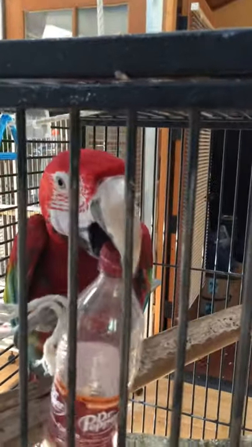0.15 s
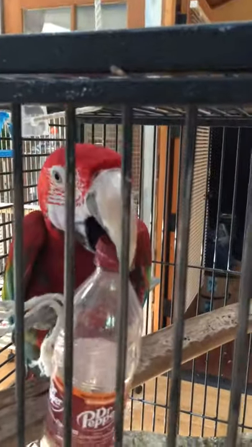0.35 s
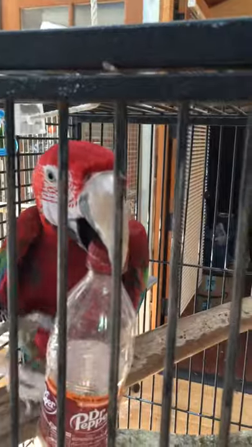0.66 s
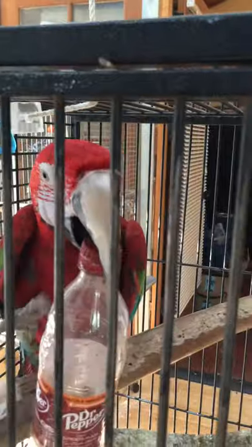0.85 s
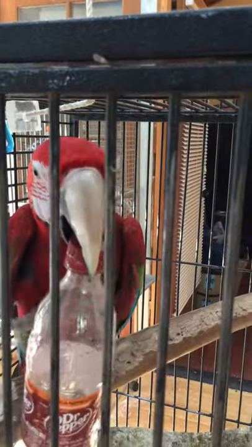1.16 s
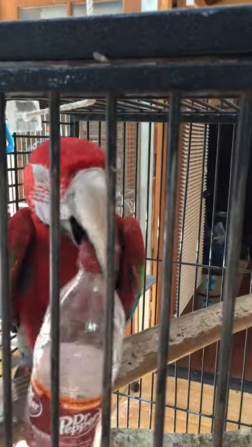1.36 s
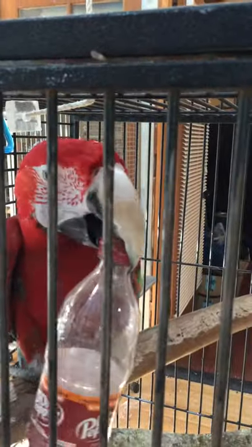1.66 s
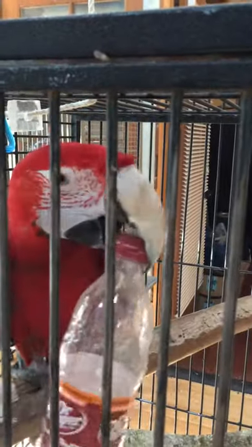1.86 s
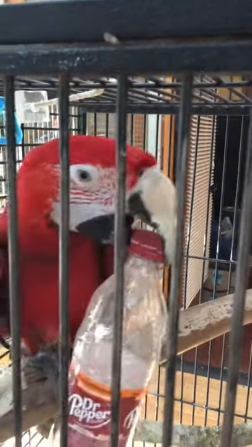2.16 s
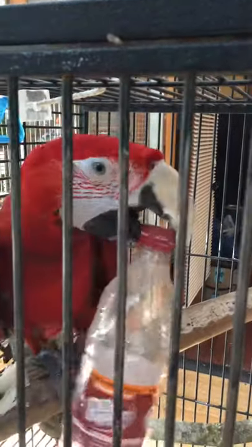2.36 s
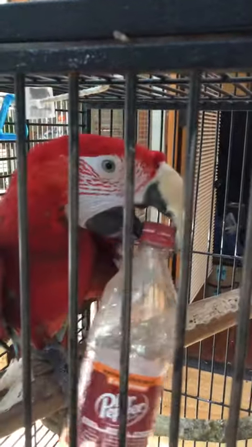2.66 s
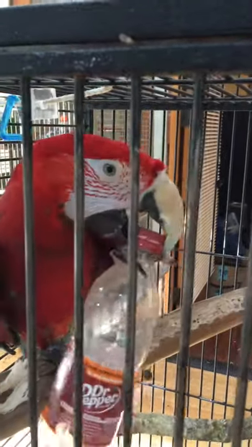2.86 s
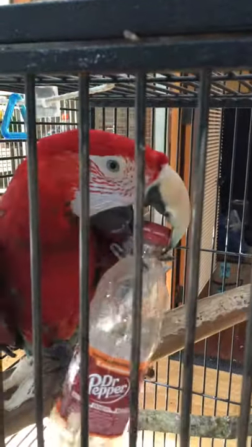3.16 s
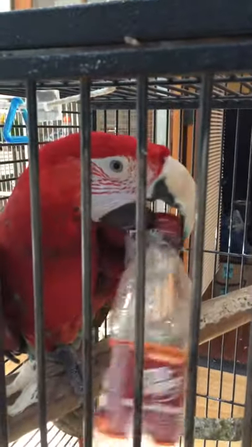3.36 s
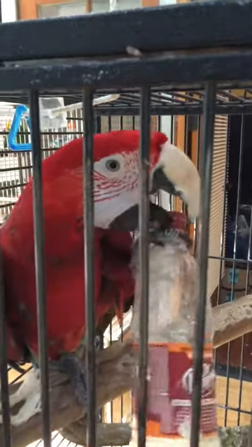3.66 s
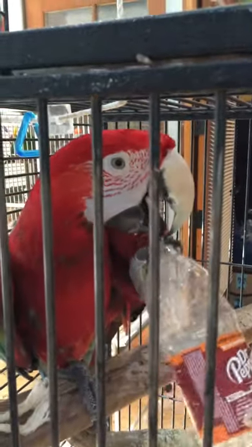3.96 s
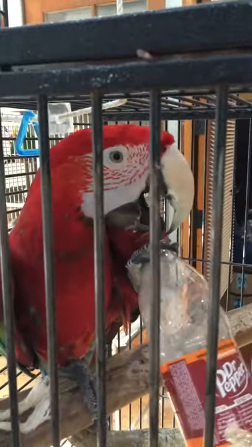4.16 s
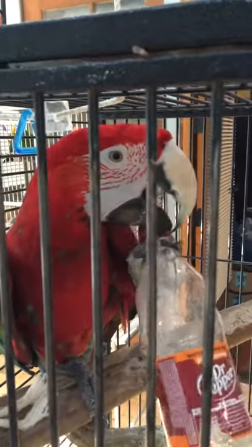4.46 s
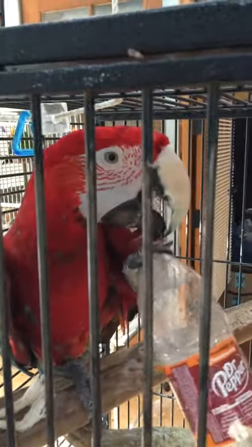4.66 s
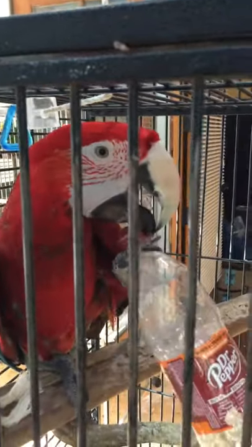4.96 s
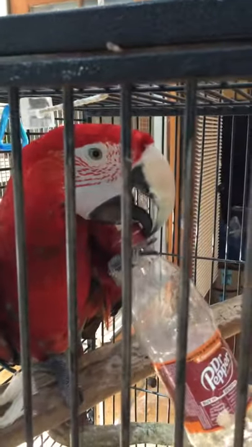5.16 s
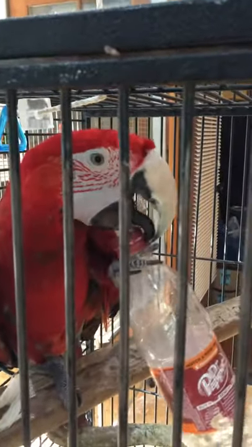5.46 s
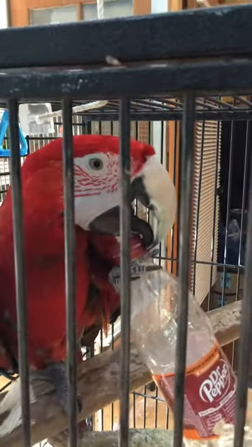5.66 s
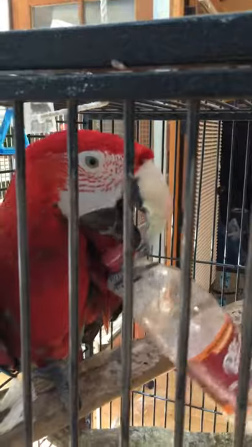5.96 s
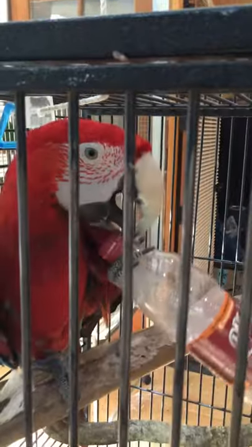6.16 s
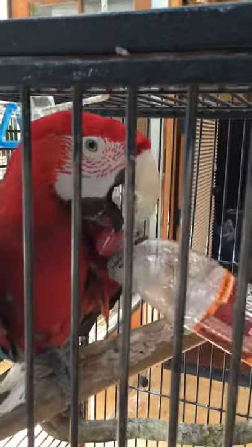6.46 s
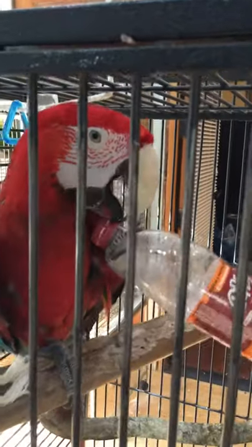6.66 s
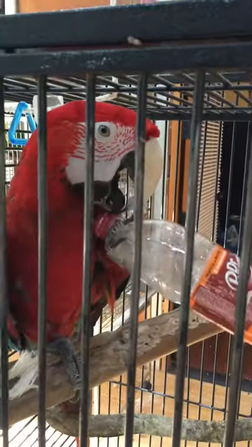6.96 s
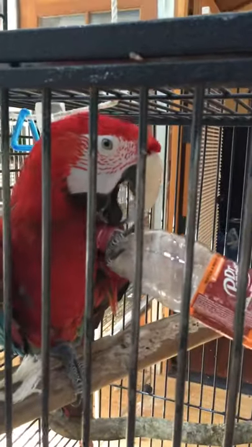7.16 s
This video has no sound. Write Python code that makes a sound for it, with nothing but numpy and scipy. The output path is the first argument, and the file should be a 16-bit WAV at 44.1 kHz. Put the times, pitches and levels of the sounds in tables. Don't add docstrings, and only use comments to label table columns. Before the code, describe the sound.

In a hard-walled bird room, the tail of a croak gives way to four long, rough parrot screams, the second loudest, with a tiny squeal between. After about four seconds it quietens: a beak knocks on a nearby hollow plastic bottle, feathers flutter, cage metal faintly jingles. A short grunt and screech end it. A phone hears the birds some metres off, the bottle close.

```python
import sys
import numpy as np
from scipy import signal
from scipy.fft import rfft, irfft
from scipy.io import wavfile
from scipy.ndimage import uniform_filter1d, minimum_filter1d

SR = 44100
rng = np.random.default_rng(int(sys.argv[2]) if len(sys.argv) > 2 else 0)


def to_wav(s):
    ch = np.atleast_2d(s).T
    pcm = np.round(np.clip(ch, -1, 1) * 32767)
    wavfile.write(sys.argv[1], SR, pcm.astype(np.int16))


def attenuation_scalar(level_db):
    decades = np.asarray(level_db, float) / 20
    return 10 ** decades


N = 322812
LEAD = 10000


def evened(x):
    return x / np.sqrt(np.mean(x ** 2) + 1e-20)


def read(points, hz):
    f, value = np.transpose(points)
    return np.interp(np.log(hz + 1), np.log(f + 1), value)


def coloured(x, points, tilt_db=0):
    hz = np.fft.rfftfreq(len(x), 1 / SR)
    gain_db = read(points, hz) + tilt_db * np.log2(hz / 4000 + 0.00045)
    return evened(irfft(rfft(x) * attenuation_scalar(gain_db), len(x)))


def add(mix, s, sound):
    part = mix[round(s * SR) + LEAD:][:len(sound)]
    part += sound[:len(part)]


def wander(size, smooth_s):
    span = max(int(smooth_s * SR), 1)
    noise = rng.standard_normal(size)
    return evened(uniform_filter1d(uniform_filter1d(noise, span), span))


def resonate(x, hz, width):
    turn = np.exp(2j * np.pi * np.cumsum(hz * np.ones(len(x))) / SR)
    r = np.exp(-np.pi * width / SR)
    return 2 * (turn * signal.lfilter([1 - r], [1, -r], x / turn)).real


def pulses(turns, hz):
    return sum(np.cos(2 * np.pi * k * turns) for k in range(1, int(16000 / hz.max()) + 1))


# (t/s, length/s, effort level/dB, sag/dB per s, rise/s)
SQUAWKS = [
    (.488, .6, -9, -7, .085),
    (1.331, .56, -7, -7.5, 0.12),
    (2.2, 0.59, -10.5, 1.5, 0.12),
    (3.089, .56, -11, 0.5, 0.062),
]
# (lower shut f/Hz, lower open f/Hz, upper shut f/Hz, upper open f/Hz)
THROATS = [(1860, 1990, 2700, 2730), (1920, 2000, 2650, 2740), (1850, 1930, 2590, 2770),
           (1798, 1920, 2560, 2680)]
# (left level/dB, right level/dB, flare t/s after start, flare level/dB)
TONES = [(-17.5, -22, .1, 4), (-17, -20.5, .44, 3), (-19, -21, .43, 9.5), (-21.5, -21.5, 0.096, 4)]
# (left start f/Hz, left end f/Hz, right start f/Hz, right end f/Hz, band jump f/Hz)
SIDES = [(913.6, 892, 1095, 1085, 180), (895.4, 880, 1070, 1080, 140), (894, 840, 1030, 1060, 35),
         (858, 835, 1035, 1060, 83)]
# (f/Hz, level/dB per Hz)
SQUAWK_COLOUR = [(200, -54.5), (400, -41.5), (590, -33.5), (700, -22.5), (880, -13), (1100, -17.5),
                 (1300, -13), (1680, -8.5), (2000, -5), (2800, -5.5), (3100, -7.5), (3700, -7), (6500, -19),
                 (15500, -47)]


def squawk(row, throat, tone, sides):
    s, length, level_db, sag_db, rise = row
    left_tone_db, right_tone_db, flare_s, flare_db = tone
    left_from, left_to, right_from, right_to, jump_hz = sides
    t = np.arange(0, length, 1 / SR)
    size = len(t)

    onset_db = -25.5 * np.maximum(1 - t / rise, 0) ** 2
    release_db = -14 * np.maximum(1 - (length - t) / 0.04, 0)
    effort_db = level_db + sag_db * t + onset_db + release_db
    beak = 1 - (1 - t / length / 0.7) ** 2
    low_hz, high_hz = (shut + (wide - shut) * beak for shut, wide in np.reshape(throat, (2, 2)))
    flare = np.exp(-((t - flare_s) / 0.036) ** 2)
    rough = np.clip(0.66 - 0.18 * flare + 0.08 * wander(size, 0.023), 0, 1)

    left_hz = np.linspace(left_from, left_to, size)
    right_hz = np.linspace(right_from, right_to, size)
    left = np.cumsum(left_hz * (1 + 0.016 * wander(size, 0.004))) / SR
    right = np.cumsum(right_hz * (1 + 0.02997 * wander(size, 0.004))) / SR
    chop = 0.57 + np.cos(2 * np.pi * right) + 0.5 * np.cos(4 * np.pi * right)
    voiced = (1 + pulses(left, left_hz)) * chop
    puffs = 0.24 + np.exp(-(left % 1) / 0.5)
    air = puffs * attenuation_scalar(1.1 * wander(size, 0.0047)) * rng.standard_normal(size)
    drive = coloured((1 - rough) * evened(voiced) + rough * evened(air), SQUAWK_COLOUR)

    holding = np.minimum(np.arange(size)[::-1] / (0.07 * SR), 1)
    low, high = (holding * attenuation_scalar(flare_db * flare + 3.5 * wander(size, 0.013)) for _ in range(2))
    low_jumps, high_jumps = (jump_hz * np.round(0.85 * wander(size, 0.022)) for _ in range(2))
    low_band = 2.35 * low * resonate(drive, low_hz + low_jumps, 60)
    high_band = 2.4 * high * resonate(drive, high_hz + high_jumps, 64)
    drive = drive + low_band + high_band

    left_gain = 1.35 * attenuation_scalar(left_tone_db + 4 * wander(size, 0.018))
    right_gain = 1.56 * attenuation_scalar(right_tone_db + 4 * wander(size, 0.018))
    tones = holding * (left_gain * np.sin(2 * np.pi * left) + right_gain * np.sin(2 * np.pi * right))
    flutter = attenuation_scalar(2.2 * wander(size, 0.005))
    return s, attenuation_scalar(effort_db) * (evened(drive) + tones) * flutter * signal.windows.tukey(size, 0.05)


def columns(rows):
    s, *values = np.transpose(rows)
    t = np.arange(s[0], s[-1], 1 / SR)
    return s[0], [np.interp(t, s, v) for v in values]


# (t/s, effort level/dB, pitch f/Hz)
CROAK = [(-.2, -5, 402), (0, -8.5, 412.1), (.07, -15, 420.7), (.185, -16.5, 430.2), (.205, -25.5, 435)]
SQUEAL = [(1.97, -36, 2030), (2.0, -21.5, 2062), (2.06, -24, 2161), (2.1, -17, 2098), (2.135, -18, 2080),
          (2.15, -12.5, 2028), (2.17, -22.5, 2062), (2.21, -35.5, 2050)]
SCREECH_ONSET = [(6.999, -41, 1435), (7.05, -20.5, 1520), (7.115, -24, 1470)]
SCREECH = [(7.07, -26.5, 1947), (7.115, -13.5, 1967), (7.18, -20, 2040), (7.235, -26, 2091)]
# (f/Hz, level/dB per Hz)
CROAK_COLOUR = [(250, -35.5), (420, -26.5), (840, -7.5), (1270, -5.5), (1700, 2), (2100, -1.5),
                (2450, -2.5), (2800, -4), (3400, -2), (5800, -14.5), (15500, -43.5)]
SQUEAL_COLOUR = [(700, -56.5), (1100, -39), (2050, -9), (3100, -8), (4150, -2), (6200, -8), (8200, -12.5),
                 (10500, -19.5), (15500, -27.5)]
SCREECH_ONSET_COLOUR = [(350, -70), (600, -46), (716, -46), (1360, -15), (2190, -12), (3030, -5), (3610, -14.5),
                        (9760, -31), (15500, -52)]
SCREECH_COLOUR = [(350, -85), (600, -57), (1230, -32), (1990, -6.5), (2750, -13.5), (3820, -1.5),
                  (4810, -13), (5440, -13), (7430, -15.5), (10300, -24), (12500, -32.5), (14300, -32),
                  (15500, -38)]
CROAK_VOICE = (0.55, .25, .3, 0.11, .016, .1)
SQUEAL_VOICE = (.68, -.05, .05, .55, .011, -0.06)
SCREECH_ONSET_VOICE = (.65, 0.6, .45, .22, .035, 0.085)
SCREECH_VOICE = (.57, .63, .5, 0.76, .036, .45)


def call(rows, colour, voice):
    s, (effort_db, hz) = columns(rows)
    size = len(hz)
    rough_from, rough_to, doubling_from, doubling_to, jitter, throb_depth = voice
    rough = np.clip(np.linspace(rough_from, rough_to, size), 0.1, 1)
    doubling = np.clip(np.linspace(doubling_from, doubling_to, size), 0.1, 1)
    turns = np.cumsum(hz * (1 + jitter * wander(size, 0.005))) / SR
    voiced = pulses(turns, hz) * (1 + doubling * np.cos(np.pi * turns))
    air = (0.39 + np.exp(-(turns % 1) / 0.41)) * rng.standard_normal(size)
    drive = coloured((1 - rough) * evened(voiced) + rough * evened(air), colour)
    throb_hz = 93.14 * (1 + 0.15 * wander(size, 0.02))
    throb = 1 + throb_depth * np.cos(2 * np.pi * np.cumsum(throb_hz) / SR)
    flutter = attenuation_scalar(2.06 * wander(size, 0.0045))
    return s, attenuation_scalar(effort_db) * drive * throb * flutter * signal.windows.tukey(size, 0.06)


# (t/s, peak level/dB, ring f/Hz, t60/s)
KNOCKS = [(4.067, -20, 1170, 0.025), (4.085, -33.5, 906, 0.019), (4.169, -40, 1160, 0.033),
          (4.244, -54, 676, 0.023), (4.561, -18.5, 1148, 0.024), (4.828, -48, 1150, 0.033),
          (4.845, -47, 1155, 0.03), (4.896, -50.5, 1160, 0.033), (4.909, -45, 1150, 0.026),
          (4.966, -48, 1130, 0.025), (4.582, -39.5, 927, 0.043), (4.6, -44, 1140, 0.027),
          (5.045, -37, 1160, 0.022), (5.154, -36.5, 1090, 0.02), (5.196, -58, 1100, 0.018),
          (5.885, -43, 641, 0.018), (6.129, -31.5, 1200, 0.018), (6.357, -28, 1020, 0.03),
          (6.798, -53.5, 1180, 0.025), (7.129, -39, 1000, 0.015), (7.203, -45, 910, 0.09),
          (7.288, -49, 900, 0.022)]


def knock(s, peak_db, hz, t60):
    t = np.arange(3000) / SR
    wall = attenuation_scalar(-60 * t / t60) * np.sin(2 * np.pi * hz * t)
    hollow = 0.42 * attenuation_scalar(-60 * t / 0.023) * np.sin(2 * np.pi * 0.6 * hz * t)
    tick = 0.29 * attenuation_scalar(-60 * t / 0.0059) * np.sin(2 * np.pi * 2.1 * hz * t)
    return s, -attenuation_scalar(peak_db) * (wall + hollow + tick) * np.minimum(t / 0.0009, 1)


# (t/s, level/dB, rise/s, hold/s, brightness/dB per octave)
SHAKES = [(1.248, -47.5, 0.016, .05, -1.5), (4.275, -48.5, 0.063, 0.109, -0.5),
          (5.036, -47, 0.0042, .03, 1.5), (5.219, -53, 0.0068, 0.088, -0.5), (5.505, -42, 0.0049, .06, 3.5),
          (6.288, -55, 0.012, 0.03, 1), (6.454, -43, 0.0068, 0.042, 0), (6.764, -58.5, 0.012, 0.049, 2.5)]
# (f/Hz, level/dB per Hz)
SHAKE_COLOUR = [(240, -46.5), (400, -7), (527, -18.5), (784, -1.5), (1000, -10), (1400, -5), (5910, -2.5),
                (11900, -8.5), (15500, -13.5)]


def shake(s, level_db, rise, hold, tilt_db):
    t = np.arange(int((rise + hold + 0.11) * SR)) / SR
    shape = np.minimum(t / rise, 1) * attenuation_scalar(-60 * np.maximum(t - rise - hold, 0) / 0.1)
    flutter = attenuation_scalar(3.8 * wander(len(t), 0.006))
    rustle = coloured(rng.standard_normal(len(t)), SHAKE_COLOUR, tilt_db)
    return s, attenuation_scalar(level_db) * shape * flutter * rustle


# (t/s, level/dB, rattle length/s, which set of modes)
JINGLES = [(4.32, -54, 0.19, 0), (4.72, -58.5, 0.094, 1), (4.961, -73, .05, 2), (5.972, -49, 0.065, 2),
           (2.93, -36, 0.069, 3)]
# (f/Hz, width/Hz, level/dB)
METALS = [
    [(2760, 110, 0), (4200, 170, 0), (5900, 220, -7), (7650, 260, -3), (9850, 220, -9), (12200, 280, -11)],
    [(2830, 90, -4), (5850, 220, 1), (7770, 200, -2), (9940, 130, -10)],
    [(1240, 220, -8), (2240, 200, 0), (2960, 150, -7), (4270, 140, -13), (6150, 120, -20)],
    [(2400, 90, 0), (7200, 200, -14), (12000, 250, -22)],
]


def jingle(s, level_db, length, metal):
    t = np.arange(int(0.6 * SR)) / SR
    taps = rng.standard_normal(len(t)) * (rng.random(len(t)) < 1500 / SR)
    taps = taps + 2.0 * (t == 0)
    ring = np.zeros(len(t))
    for hz, width, db in METALS[round(metal)]:
        mode = evened(resonate(resonate(taps, hz, width), hz, width))
        ring += attenuation_scalar(db) * mode * np.exp(-t / length * (hz / 3000) ** 0.41)
    return s, attenuation_scalar(level_db) * ring


# (f/Hz, t60/s)
ROOM = [(300, 1), (900, 0.62), (1600, 0.69), (3500, 0.64), (9000, 0.45), (15000, 0.35)]


def room(x):
    out = np.zeros(len(x))
    for k in range(3):
        taps = np.zeros(SR)
        at = np.arange(300, SR - 20, 20)
        taps[at + rng.integers(0, 20, len(at))] = rng.choice([-1., 1.], len(at))
        hz, t, z = signal.stft(taps, SR, nperseg=256)
        decay = attenuation_scalar(-60 * t / read(ROOM, hz)[:, None])
        tail = signal.istft(z * decay, SR, nperseg=256)[1]
        share = np.sqrt(2 / 3) * np.cos(2 * np.pi * (0.15 * np.arange(len(x)) / SR + k / 6))
        out += signal.fftconvolve(x * share, tail / np.linalg.norm(tail))[:len(x)]
    return out


def surges(rows, base_db):
    t = np.arange(0, N / SR + 0.01, 0.002)
    power = attenuation_scalar(2 * base_db)
    for s, db, rise, fall in rows:
        swell_db = db - 12.5 * np.maximum(s - t, 0) / rise - fall * np.maximum(t - s, 0)
        power = power + attenuation_scalar(2 * swell_db)
    return np.interp(np.arange(N) / SR, t, np.sqrt(power))


# (peak t/s, level/dB, rise/s, fall/dB per s)
THUDS = [(0.001, -46, .003, 900), (.51, -56, 0.12, 30), (1.45, -63, 0.39, 120), (1.85, -52, 0.068, 100),
         (2.02, -55, 0.048, 16), (3.16, -61.5, 0.1, 20), (3.89, -60.5, .1, 43), (4.2, -54, .08, 7),
         (5.27, -50.5, .04, 30), (5.71, -60, .1, 60), (5.99, -47.5, 0.025, 112), (6.15, -60, 0.054, 18),
         (6.38, -59, .04, 100), (6.5, -57, 0.036, 60), (6.67, -60.5, .08, 14)]
# (peak t/s, level/dB, rise/s, fall/dB per s)
STIRS = [(4.0, -55.5, .1, 30), (4.4, -56.5, 0.26, 23.5), (5.22, -54, .1, 19), (6.47, -56, .1, 48.5),
         (6.85, -65.5, .15, 5)]
# (f/Hz, level/dB per Hz)
RUMBLE_COLOUR = [(12, -54.5), (20, -23), (65, -4), (135, -2), (206, -2.5), (248, -6), (316, -8), (403, -18),
                 (500, -14), (650, -40.5), (1100, -120)]
STIR_COLOUR = [(500, -12), (1200, 0), (2500, 0), (5000, -2), (9000, -9.5), (13000, -13), (15400, -3)]
HISS_COLOUR = [(200, -30), (330, -10), (600, -7), (1150, -3), (1600, -9), (2900, -11), (3500, -17),
               (6400, -22), (15500, -30)]


def house():
    rumble = coloured(rng.standard_normal(N), RUMBLE_COLOUR) * surges(THUDS, base_db=-73.5)
    rumble = rumble * attenuation_scalar(2.2 * wander(N, 0.03))
    stir = coloured(rng.standard_normal(N), STIR_COLOUR) * surges(STIRS, base_db=-73)
    hiss = attenuation_scalar(-64) * coloured(rng.standard_normal(N), HISS_COLOUR)
    return rumble + stir + hiss


def limited(x):
    gain = minimum_filter1d(1 / np.maximum(abs(x), 0.97), size=301)
    return x * uniform_filter1d(uniform_filter1d(gain, size=150), size=150) * 1.031


# (f/Hz, level/dB)
MARGIN = [(2400, 90), (3000, 24), (4500, 14), (7000, 8.5), (11000, 7), (13000, 4), (15000, 2.5)]


def masked(x):
    hz, t, z = signal.stft(x, SR, nperseg=2048, noverlap=1024)
    power = uniform_filter1d(abs(z[:, :1024]) ** 2, size=2, axis=2)
    band = power.reshape(1, 128, 8, -1).mean(2)
    around = uniform_filter1d(band, size=11, axis=1)
    waver_db = 7.5 * uniform_filter1d(rng.standard_normal(band.shape), size=4, axis=2)
    hidden = band < around * attenuation_scalar(2 * (waver_db - read(MARGIN, hz[4:1024:8])[:, None]))
    z[:, :1024] *= np.repeat(np.where(hidden, 0.03, 1), 8, axis=1)
    return signal.istft(z, SR, nperseg=2048, noverlap=1024)[1][:, :N]


def scene():
    far, near = np.zeros(N + LEAD), np.zeros(N + LEAD)
    for row, throat, tone, sides in zip(SQUAWKS, THROATS, TONES, SIDES):
        add(far, *squawk(row, throat, tone, sides))
    add(far, *call(CROAK, CROAK_COLOUR, CROAK_VOICE))
    add(far, *call(SQUEAL, SQUEAL_COLOUR, SQUEAL_VOICE))
    add(far, *call(SCREECH_ONSET, SCREECH_ONSET_COLOUR, SCREECH_ONSET_VOICE))
    add(far, *call(SCREECH, SCREECH_COLOUR, SCREECH_VOICE))
    for row in KNOCKS:
        add(near, *knock(*row))
    for row in SHAKES:
        add(far, *shake(*row))
    for row in JINGLES:
        add(far, *jingle(*row))
    direct = attenuation_scalar(-5) * far + near
    reverb = room(attenuation_scalar(-5) * far + attenuation_scalar(-15) * near)
    return ((direct + reverb)[LEAD:] + house())[None]


def top_cut(x):
    return signal.sosfilt(signal.butter(12, 15670, fs=SR, output="sos"), x)


def record(dry):
    mix = masked(limited(dry))
    return top_cut(mix)


dry = scene()
out = record(dry)
to_wav(out)
```